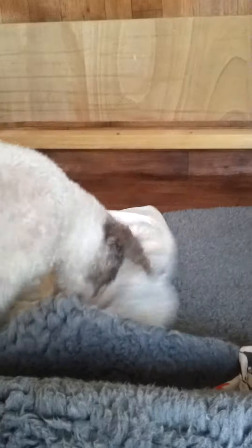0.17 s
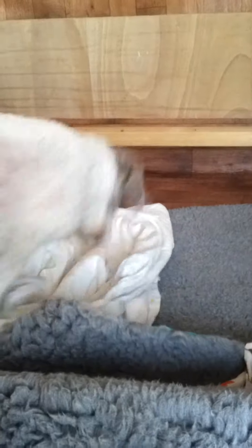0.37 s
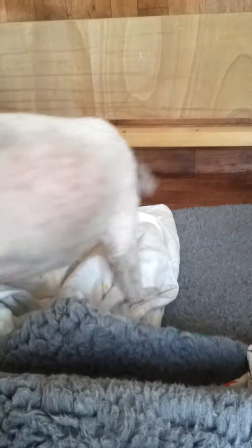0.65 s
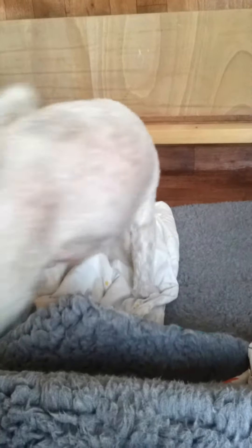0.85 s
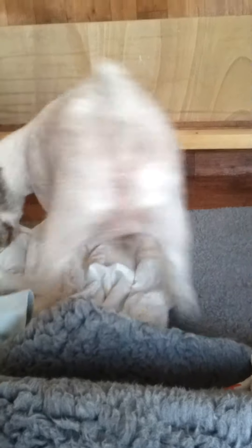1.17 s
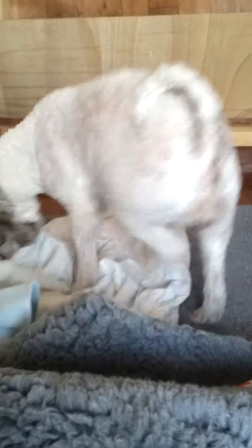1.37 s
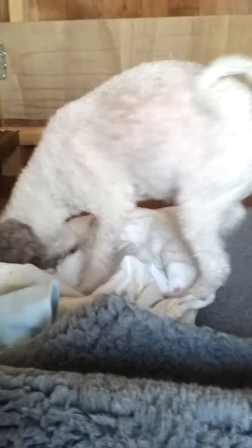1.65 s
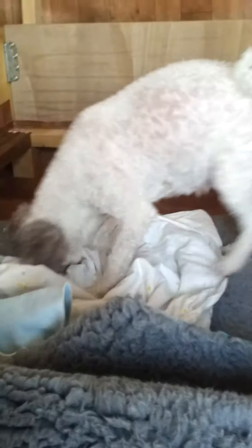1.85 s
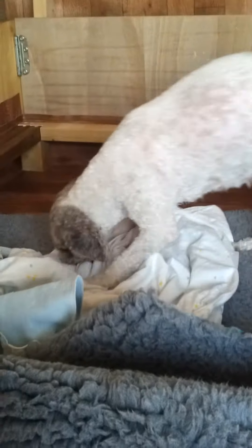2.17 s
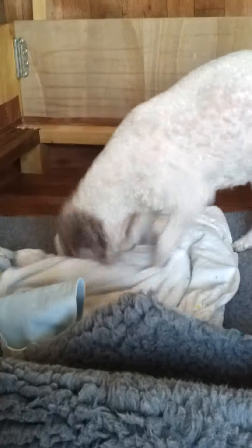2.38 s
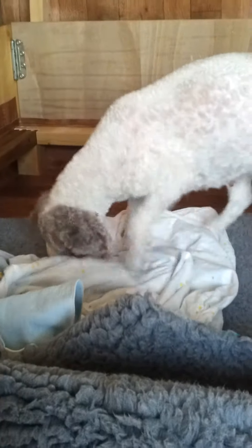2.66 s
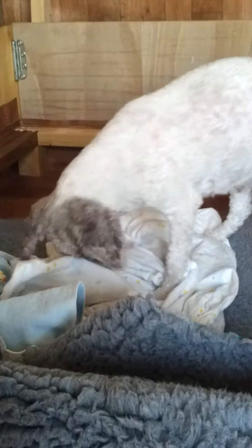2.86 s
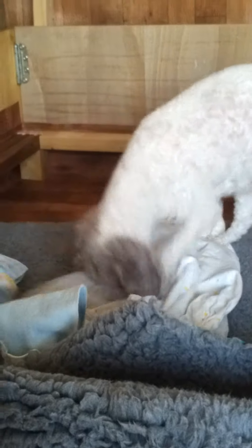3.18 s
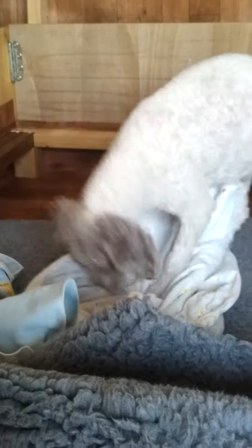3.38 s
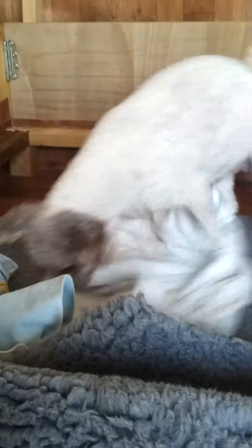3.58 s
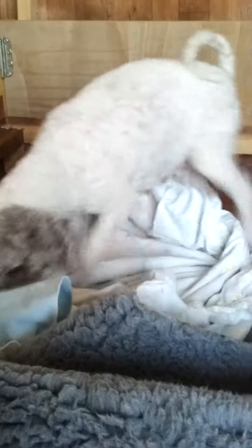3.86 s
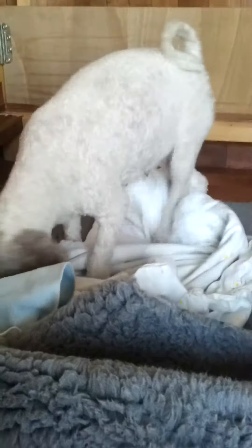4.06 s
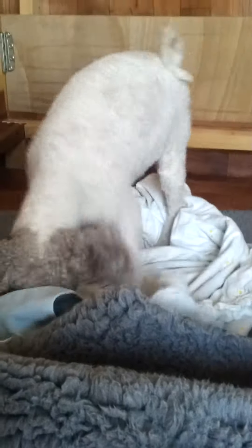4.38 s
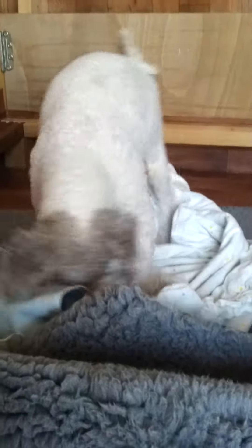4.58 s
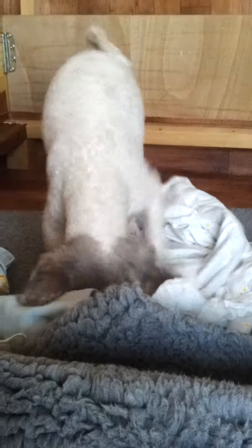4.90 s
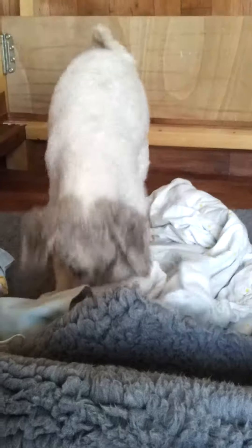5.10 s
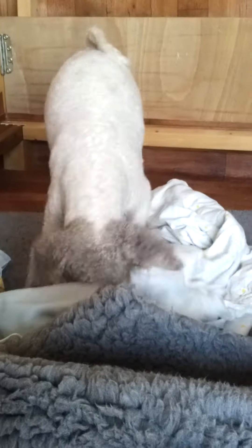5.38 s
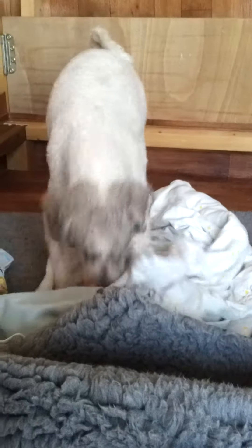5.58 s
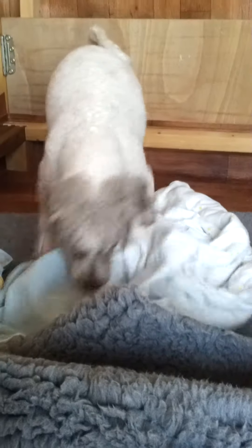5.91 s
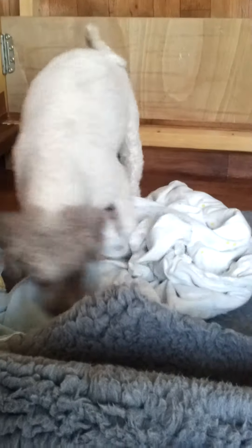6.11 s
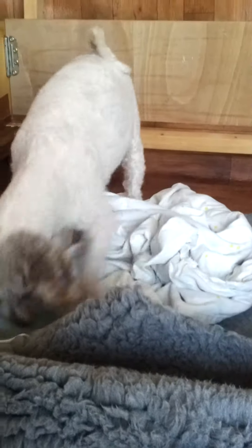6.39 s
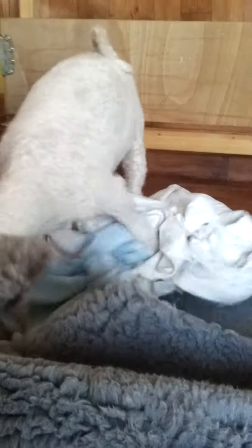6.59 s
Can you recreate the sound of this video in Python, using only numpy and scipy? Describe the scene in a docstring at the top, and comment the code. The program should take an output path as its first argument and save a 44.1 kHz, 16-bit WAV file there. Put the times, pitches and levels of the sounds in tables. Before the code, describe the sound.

Fabric swishes and scuffs in irregular strokes while paws land with muffled, hollow wooden thuds. Claws tick free of the cloth, and a bright sniff rises just after three seconds, followed by a loud snap and short rasp. Blows crowd together near five and a half seconds. The microphone is very close, in stereo, within a quiet room with slight hiss and low rumble.

```python
"""A small dog digs in blankets inside a wooden box, close to a pair of microphone ports.
Its strokes are shaped noise: swishing fibres, scuffing weave and low friction through the boards.
Padded blows ring a bank of board modes, claws snap as ticks with a short crackle, and sniffs and
rasps are resonant noise. One thin note rings once, and the room adds soft hiss and low rumble."""
import sys
import numpy as np
from scipy import signal
from scipy.fft import rfft, irfft
from scipy.io import wavfile
from scipy.ndimage import uniform_filter1d

SR = 44100
rng = np.random.default_rng(int(sys.argv[2]) if len(sys.argv) > 2 else 0)


def wav_record(signal):
    """Record a signal, one row per channel, as 16-bit PCM in the file named by sys.argv[1]."""
    frames = np.transpose(np.atleast_2d(signal))
    bounded = np.clip(frames, -1, 1)
    # unit amplitude maps onto the largest positive 16-bit level
    quanta = np.round(bounded * 32767).astype(np.int16)
    wavfile.write(sys.argv[1], SR, quanta)


N = 297478  # length [samples]

# Spectrum of the room tone: (frequency [Hz], relative density [dB])
ROOM_SPECTRUM = [(15, -51), (25, -36), (97, -4), (179, -4.5), (240, -8), (549, -13.5), (661, -12.5),
                 (1250, -17), (1360, -16.5), (1820, -19), (3350, -20), (3930, -19.5), (4260, -22),
                 (14500, -22.5)]
ROOM_DB = -57
# Likeness of the two ports for the room: (frequency [Hz], coherence [-1 to 1])
ROOM_LIKENESS = [(60, 0.48), (600, 0), (1400, .0), (14000, .0)]
# Likeness of the two ports for the dog: (frequency [Hz], coherence [-1 to 1])
DOG_LIKENESS = [(60, 0.97), (250, 0.7), (700, 0.92), (1400, 0.16), (2200, 0.02), (3000, 0.051),
                (4500, 0.15), (12000, 0.061)]
# Colour difference of the ports: (frequency [Hz], left minus right [dB])
PORT_BALANCE = [(100, 2.5), (400, 1), (700, -2.5), (1200, 1.5), (2500, -1.5), (8000, -1.5), (13000, -1.4)]
# Decay of the echoes: (frequency [Hz], time to fall 60 dB [s])
ECHO_DECAY = [(150, 0.11), (700, 0.3), (3000, 0.37), (10000, 0.26)]
# One thin ringing note: (time [s], starting level [dB], pitch [Hz], time to fall 60 dB [s])
RINGING_NOTE = (1.497, -48.5, 1276, .26)
# Sniffs, one list each: (time [s], level before the bands add [dB], nostril resonance [Hz])
SNIFF_CURVES = [
    [(.43, -66, 2250), (.445, -64, 2280), (.5, -60, 2360), (.545, -69, 2400), (.565, -72, 2430)],
    [(3.085, -49, 1890), (3.11, -48, 2080), (3.14, -65, 2210), (3.165, -52, 2570), (3.2, -43.5, 2830),
     (3.23, -60, 2790), (3.26, -65, 2800)],
]
# A claw drawn along taut cloth, one list each: (time [s], level setting [dB], base pitch [Hz])
RASP_CURVES = [
    [(3.36, -53, 1950), (3.446, -59, 1850), (3.454, -67, 1760), (3.47, -62, 1760)],
    [(5.49, -51, 1660), (5.514, -56, 1870), (5.584, -49.5, 1750), (5.61, -57, 1660), (5.66, -55, 1800),
     (5.72, -63, 1900)],
]
# Claws snapping free of the weave: (time [s], tick level before filtering [dB])
CLAW_SNAPS = [(0.5796, -46.5), (0.5854, -46.6), (1.2921, -39.5), (1.2956, -41), (1.302, -41), (1.4893, -36),
              (3.3507, -34.6), (3.3538, -20), (3.8735, -41.6), (3.876, -40.4), (3.8774, -44), (3.8835, -38),
              (4.6988, -39), (4.7032, -36.4), (4.7046, -35), (4.9116, -39), (5.4061, -40), (5.4765, -40.7),
              (5.6646, -33.3), (5.6668, -31.5), (5.6706, -37.1), (5.9862, -35.9)]
# Modes of the boards: (frequency [Hz], relative level [dB], time to fall 60 dB [s])
BOARD_MODES = [(138, -33, .07), (205, -26, 0.094), (243, 0, 0.13), (254.7, 8, 0.13), (305, 8.5, 0.2),
               (354, -31, 0.098), (486, -5, 0.15), (507.3, -3, 0.16), (631, -3, 0.043), (700.4, 0, 0.06),
               (729, -0.5, 0.069), (823, -0.5, 0.047), (900, 2, 0.081), (1015, 5, 0.12), (1100, 9, 0.086),
               (1248, 6, 0.07), (1405, 17, 0.012), (1590, -4, 0.017), (2040, -24, 0.042), (2200, -24, .03),
               (2750, -23, .025)]
# Padded blows: (time [s], level setting [dB], heaviness as bass [dB], hardness as treble [dB],
# contact decay [s], pitch of the struck spot [Hz], first touch [factor on the push])
PAW_BLOWS = [(0.092, -40, -27, -5, 0.011, 810, 4.3), (0.577, -43.5, -18, -18, 0.01, 883, 8.8),
             (0.66, -46, -7, -14, 0.012, 604, 6.4), (1.241, -43.5, -3.5, -21, 0.0059, 650, 8.2),
             (1.491, -45, -8, -13, 0.0031, 627, 7), (1.75, -38, -21, -18, 0.0041, 605, 11),
             (2.064, -41.5, 12, -23, 0.0022, 740, 7), (2.079, -33, -7, -16, 0.011, 776, 7),
             (2.107, -39, -3, 0, 0.0061, 547, 6.3), (2.183, -31, -8, -3, 0.003, 744, 2.3),
             (2.244, -46, 2, -2, 0.0034, 724, 9.8), (2.29, -45, -2, -1, 0.037, 509, 7.2),
             (2.945, -49, -3, -23, 0.008, 655, 5.6), (3.259, -37.5, -13, -19, 0.0089, 730, 7.7),
             (3.319, -37.5, -10, -24, 0.011, 730, 6.4), (3.36, -36, -34, -3, 0.0058, 460, 4.7),
             (3.569, -39, -5, -6, 0.023, 760, 11), (3.877, -57, -4, -2, 0.013, 711, 8.3),
             (4.191, -40.5, -32, -30, 0.016, 516, 4.9), (4.435, -32.5, -6.5, -18, 0.0088, 660, 4.8),
             (4.449, -34, -2, -11, 0.0026, 590, 10), (4.728, -43.5, -3, -20, 0.03, 467, 6.1),
             (4.854, -45.5, -22, 1, 0.0053, 800, 6.9), (4.916, -30, -28, -9.5, 0.0048, 670, 7.6),
             (4.932, -31.5, -5, -6, 0.006, 610, 5.6), (5.009, -34.5, -22, -18, 0.0085, 670, 7.6),
             (5.405, -32.5, -35, -18, 0.0043, 580, 8), (5.4776, -29, -34, 3.5, 0.0016, 810, 1.3),
             (5.549, -35.5, -26, -15, 0.008, 477, 7.7), (5.618, -42, -18, 4.5, 0.0097, 509, 12),
             (5.651, -37, 0, -0.5, 0.0033, 686, 7.7), (5.686, -33, -20, -14, 0.0058, 530, 7.2),
             (5.78, -42.5, -16, -8, 0.022, 686, 9.8), (5.86, -35.5, -33, -4, 0.0046, 670, 8.2),
             (6.033, -38.5, -12, -5.5, 0.0039, 695, 8.7), (6.544, -42.5, 6, -31, 0.0085, 490, 5.2)]
# Spectrum of friction through the boards: (frequency [Hz], relative density [dB])
SHOVE_SPECTRUM = [(60, -66), (130, -11), (280, -1), (400, -5), (700, 0.5), (900, -2), (1100, -4.5),
                  (1500, -10), (2500, -21)]
# Spectrum of the coarse weave: (frequency [Hz], relative density [dB])
SCUFF_SPECTRUM = [(700, -24), (1300, -1.5), (2000, -0.5), (3000, -2.5), (4500, -4), (6000, -35)]
# Spectrum of the fine fibres: (frequency [Hz], relative density [dB])
SWISH_SPECTRUM = [(3500, -11), (5000, -1.5), (6000, -4), (7000, 3), (8000, -0.5), (9500, -6), (11000, -8.5),
                  (14500, -17)]
# Strokes of paws and snout: (peak time [s], swell [s], time to fade by 20 dB [s],
# swish level [dB], scuff level [dB], body level [dB], bass level [dB])
BEDDING_STROKES = [(0, 0.008, 0.55, -60.5, -58, -55.5, -63.5), (.098, .014, 0.35, -58, -61, -52, -54.5),
                   (.338, .25, .18, -58, -60, -61.5, -61), (.484, 0.1, 0.4, -60, -60.5, -65.5, -75),
                   (.58, .01, 0.36, -62.5, -69, -56, -54.5), (.828, 0.13, 0.4, -65, -64.5, -61.5, -60),
                   (.979, 0.11, 0.7, -64.5, -66, -72, -63), (1.245, 0.014, 0.9, -62.5, -66, -58, -58),
                   (1.351, 0.085, .45, -52, -55.5, -63, -79), (1.494, 0.11, 0.11, -52.5, -49.5, -54.5, -80),
                   (1.755, 0.041, 0.38, -64.5, -63, -57, -56), (2.085, 0.051, 0.27, -62, -61, -48, -44),
                   (2.12, 0.1, 0.33, -52.5, -55, -60, -60), (2.186, 0.017, 0.33, -51, -47, -50, -52.5),
                   (2.309, 0.036, .32, -57, -59, -49.5, -66), (2.512, .32, .14, -55, -63, -62, -61),
                   (2.792, 0.11, .5, -67, -78, -66, -63.5), (2.954, 0.022, .65, -64.5, -68, -63.5, -60.5),
                   (3.124, .07, 0.37, -44.5, -48, -51.5, -58), (3.222, .093, 0.05, -40.5, -44, -56, -58),
                   (3.284, 0.15, .28, -53, -55, -51, -57), (3.362, 0.059, 0.1256, -47, -45, -44, -50),
                   (3.47, 0.037, 0.24, -55.5, -58, -57.5, -61), (3.592, .07, 0.19, -54.5, -54.5, -51, -51),
                   (3.875, 0.0089, .23, -56, -65.5, -64, -60.5), (4.117, 0.083, 1, -75, -75, -59.5, -63.5),
                   (4.255, .26, 0.2, -54.5, -56, -59, -62.5), (4.44, 0.018, .19, -63, -63, -52.5, -47),
                   (4.597, .055, .2, -64, -71, -68, -59), (4.702, 0.026, 0.14, -47.5, -55.5, -58, -63),
                   (4.743, 0.062, 0, -68, -59, -59, -56), (4.861, 0.14, 0.4, -52, -54.5, -61, -69),
                   (4.92, 0.019, 0.19, -53, -50.5, -48.5, -43), (5.013, 0.0092, 0.08, -59, -59, -48, -59),
                   (5.13, .03, 0, -69, -70, -60, -61), (5.285, .14, 1.2, -59.5, -66.5, -65, -61),
                   (5.41, 0.046, .1, -56, -57.5, -46.5, -54), (5.48, 0.0092, 0.13, -58, -51, -46.5, -58),
                   (5.567, .16, 0.37, -49.5, -51, -53, -78), (5.66, 0.045, 0.27, -56, -55, -46.5, -47),
                   (5.802, 0.074, 0.02, -55.5, -68, -54, -58), (5.867, 0.1, 0.17, -54.5, -57.5, -48.5, -72),
                   (5.986, .12, 0.13, -52, -54.5, -50, -57), (6.039, 0.008, 0.11, -72, -61, -49.5, -46),
                   (6.165, .085, .5, -62, -69, -80, -65.5), (6.393, .12, 0.24, -55, -55, -49.5, -60),
                   (6.555, 0.19, .25, -51, -54, -54, -52.5)]

LAG_S = 0.00013  # the left port hears the dog later
BOX_LOW_HZ = 140  # the small box radiates little below this
CRACKLE_S = 0.0006  # decay constant
MIC_LOW_HZ, EDGE_HZ = 30.2, 14600  # low and high corners of the pickup


def gain_of(db):
    """Decibels to gain."""
    return 10 ** (np.asarray(db) / 20)


def evened(x):
    """Scales to rms 1."""
    return x / np.sqrt(np.mean(x ** 2) + 1e-20)


def read(points, hz):
    """Reads a table along a log-frequency axis."""
    f, value = np.transpose(points)
    return np.interp(np.log(hz + 1), np.log(f + 1), value)


def add(mix, s, sound):
    """Mixes a sound in at s seconds."""
    part = mix[round(s * SR):][:len(sound)]
    part += sound[:len(part)]


def butter(x, order, hz, kind):
    """Butterworth filter, run forwards."""
    return signal.sosfilt(signal.butter(order, hz, kind, fs=SR, output="sos"), x)


def noise(spectrum, likeness, patchy_db, size=512):
    """Two-port noise of rms 1, partly shared, with patches drifting in time and frequency."""
    hop = size // 4
    frames, hz = N // hop + 5, np.fft.rfftfreq(size, 1 / SR)
    a, b, c, d, patches = rng.standard_normal((frames, len(hz), 5)).T
    patches = uniform_filter1d(patches, size=6, axis=0)
    patches = evened(uniform_filter1d(patches, size=14, axis=1))
    same = np.clip(read(likeness, hz), -1, 1)[:, None]
    late = np.exp(-2j * np.pi * hz * LAG_S)[:, None]
    right = a + 1j * b
    left = same * late * right + np.sqrt(1 - same ** 2) * (c + 1j * d)
    shape = gain_of(read(spectrum, hz)[:, None] + patchy_db * patches)
    sound = signal.istft(np.array([left, right]) * shape, nperseg=size, noverlap=size - hop)[1]
    return evened(sound[:, :N])


def slips(per_s, depth, length_s):
    """Stick-slip envelope of rms 1: sudden releases die away over a steady rub."""
    releases = rng.random(N) < per_s / SR
    size = depth * np.minimum(rng.exponential(1, N), 3) * releases
    return evened(1 + signal.lfilter([1], [1, -np.exp(-1 / (length_s * SR))], size))


def banded(curves, bands):
    """Noise through resonances that follow a pitch curve; bands are (ratio, gain, width [Hz])."""
    out = np.zeros(N)
    for rows in curves:
        s, db, hz = np.transpose(rows)
        t = np.arange(s[0], s[-1], 1 / SR)
        level = gain_of(np.interp(t, s, db)) * signal.windows.tukey(len(t), .2)
        for ratio, gain, width_hz in bands:
            # a low-pass around a turning phase makes the moving resonance
            turn = np.exp(2j * np.pi * np.cumsum(ratio * np.interp(t, s, hz)) / SR)
            r = np.exp(-np.pi * width_hz / SR)
            still = signal.lfilter([1], [1, -2 * r, r * r], rng.standard_normal(len(t)) / turn)
            add(out, s[0], gain * level * evened((turn * still).real))
    return out


def placed(x, echo_db, lag_s=LAG_S):
    """Direct sound, later on the left by lag_s, plus sparse echoes that differ between the ports."""
    taps = np.zeros((2, SR // 2))
    # one echo at a random place in every 20 samples
    slots = np.arange(80, SR // 2 - 20, 20)
    at = slots + rng.integers(0, 20, (2, len(slots)))
    np.put_along_axis(taps, at, rng.choice([-1., 1.], at.shape), 1)
    hz, t, z = signal.stft(taps, SR, nperseg=256)
    fading = gain_of(-60 * t / read(ECHO_DECAY, hz)[:, None])
    tail = signal.istft(z * fading, SR, nperseg=256)[1]
    tail /= np.linalg.norm(tail[0])
    echoes = signal.fftconvolve(x[None], tail, axes=1)[:, :N]
    direct = np.array([np.roll(x, round(lag_s * SR)), x])
    return direct + gain_of(echo_db) * echoes


def room_tone():
    """Steady broadband noise, strongest in the bass, nearly unrelated at the two ports."""
    return gain_of(ROOM_DB) * noise(ROOM_SPECTRUM, ROOM_LIKENESS, 0.73, size=2048)


def ring():
    """A small hard thing is brushed and rings once as one decaying sine."""
    s, db, hz, t60 = RINGING_NOTE
    out, t = np.zeros(N), np.arange(SR // 2) / SR
    add(out, s, gain_of(db - 60 * t / t60) * np.sin(2 * np.pi * hz * t))
    return out


def sniffs():
    """Air through the nostrils: noise in a gliding resonance and two more above it."""
    return banded(SNIFF_CURVES, ((1, 0.9, 150), (1.24, 1.03, 150), (2.25, 0.25, 250)))


def rasps():
    """A claw drawn along taut cloth: noise in one gliding band, 2% under the base pitch."""
    return banded(RASP_CURVES, ((0.98, 1.1, 423),))


def snaps():
    """Claws snap free: a tick and a short crackle, lifted where the microphone port resonates."""
    out, t = np.zeros(N), np.arange(500) / SR
    for s, tick_db in CLAW_SNAPS:
        crackle = 0.21 * rng.standard_normal(500) * np.exp(-t / CRACKLE_S)
        crackle[0] = 1  # the tick
        add(out, s, gain_of(tick_db) * crackle)
    bright = butter(out, 2, [2400, 13000], "band")
    port_resonance = signal.lfilter(*signal.iirpeak(7000, 2.5, fs=SR), bright)
    return 1.9 * bright + 1.2 * port_resonance


def blows():
    """Each paw lands as a firm touch and an uneven push that ring the boards, detuned by bedding."""
    out, t = np.zeros(N), np.arange(5000) / SR
    mode_hz, mode_db, t60 = np.array(BOARD_MODES).T[:, :, None]
    for s, level_db, bass_db, treble_db, contact_s, spot_hz, firm in PAW_BLOWS:
        hz = mode_hz * (1 + 0.025 * rng.standard_normal(mode_db.shape))
        # modes near the struck spot's pitch speak loudest
        near_db = 12.7 * np.exp(-(np.log(hz / spot_hz) / 0.17) ** 2)
        tilt_db = bass_db * (mode_hz < 400) + treble_db * (mode_hz > 950)
        decay = gain_of(mode_db + near_db + tilt_db - 60 * t / t60)
        ringing = (decay * np.sin(2 * np.pi * hz * t)).sum(0)
        push = rng.standard_normal(3000) * np.exp(-t[:3000] / max(contact_s, .0005))
        push[0] = firm
        sound = signal.fftconvolve(ringing, push)
        loudest = np.sqrt(uniform_filter1d(sound ** 2, size=900).max())  # rms over about 20 ms
        # heavy or hard blows are louder as a whole
        force = np.sqrt(1 + gain_of(2 * bass_db) + gain_of(2 * treble_db))
        add(out, s, gain_of(level_db - 8) * force * sound / loudest)
    return butter(out, 3, 4000, "low")  # padding takes the edge off


def shoving(body, bass_gain):
    """Lumpy low stick-slip friction through the boards, its bass riding its own stroke gain."""
    rub = noise(SHOVE_SPECTRUM, DOG_LIKENESS, 0.84, size=1024) * slips(50, 0.23, 0.031)
    bass = signal.sosfiltfilt(signal.butter(2, 370, fs=SR, output="sos"), rub)
    return body * evened(rub - bass) + bass_gain * evened(bass)


def dragging(swish, scuff):
    """Fine fibres swish in the treble, the coarse weave scuffs below, both on the same slips."""
    fibres = swish * noise(SWISH_SPECTRUM, DOG_LIKENESS, 1.3)
    weave = scuff * noise(SCUFF_SPECTRUM, DOG_LIKENESS, 2.34)
    return slips(130, 0.15, 0.00099) * (fibres + weave)


def strokes():
    """Gains of swish, scuff, body and bass: each stroke swells smoothly, then fades; powers add."""
    t = np.arange(0, N + 64, 64) / SR
    peak, swell, fade, *dbs = np.array(BEDDING_STROKES).T[:, :, None]
    rising = np.cos(np.pi / 2 * np.clip((peak - t) / np.maximum(swell, .005), 0, 1)) ** 2
    fading = gain_of(-20 * np.maximum(t - peak, 0) / np.maximum(fade, .02))
    shape = rising * fading
    totals = [np.linalg.norm(gain_of(db) * shape, axis=0) for db in dbs]
    return [np.interp(np.arange(N) / SR, t, total) for total in totals]


def scene():
    """The dog's sounds over the room tone."""
    swish, scuff, body, bass = strokes()
    boards = shoving(body, bass) + placed(blows(), -4.5)
    box = butter(boards, 3, BOX_LOW_HZ, "high")
    claws = placed(snaps(), -15.5, lag_s=0)
    small_sounds = placed(sniffs() + rasps() + ring(), -1.7)
    return room_tone() + small_sounds + claws + box + dragging(swish, scuff)


def record(dry):
    """Small ports lose the deep bass and differ in colour; then the band limit."""
    hz = np.fft.rfftfreq(N, 1 / SR)
    balance_db = read(PORT_BALANCE, hz) * np.array([[.5], [-.5]])
    coloured = irfft(rfft(dry) * gain_of(balance_db), N)
    thinned = butter(coloured, 2, MIC_LOW_HZ, "high")
    band_limit = signal.firwin(401, EDGE_HZ, window=("kaiser", 9), fs=SR)
    return signal.oaconvolve(thinned, band_limit[None], "same")


dry = scene()
out = record(dry)
wav_record(out)
```